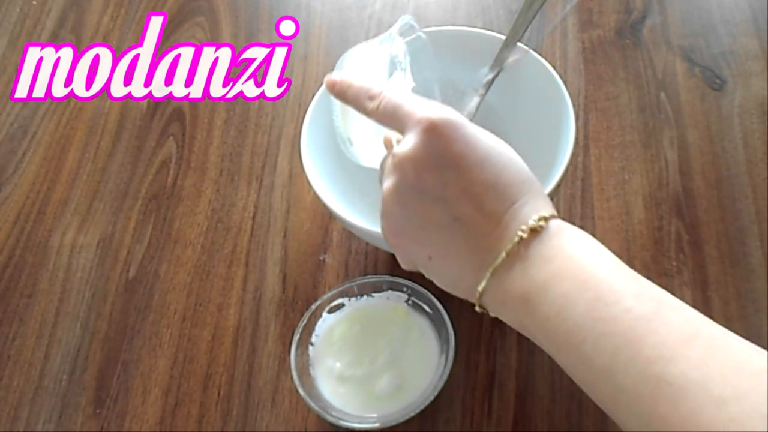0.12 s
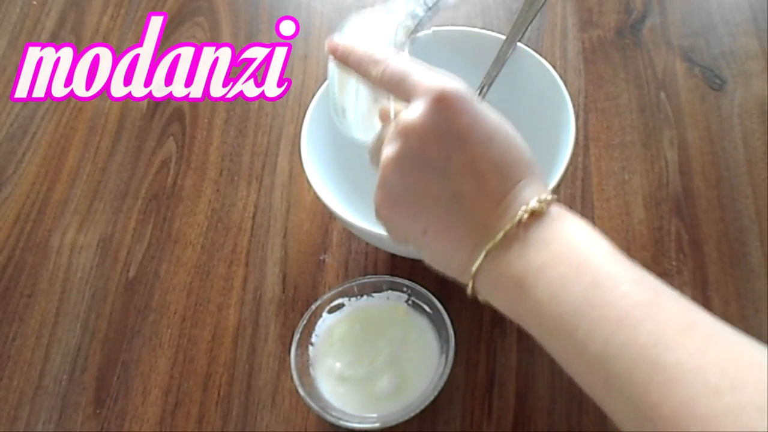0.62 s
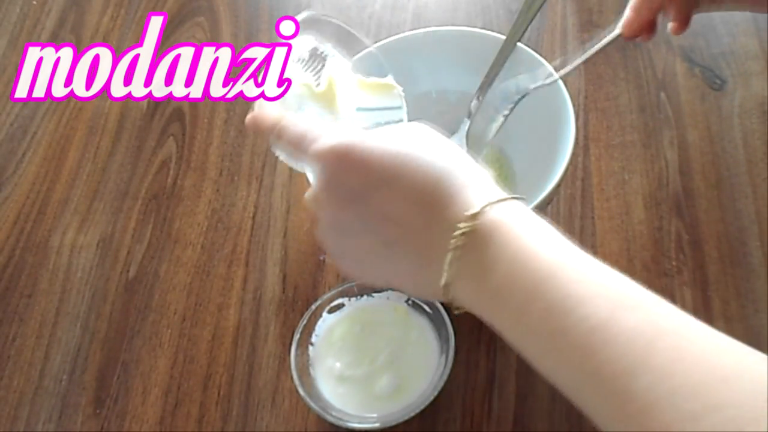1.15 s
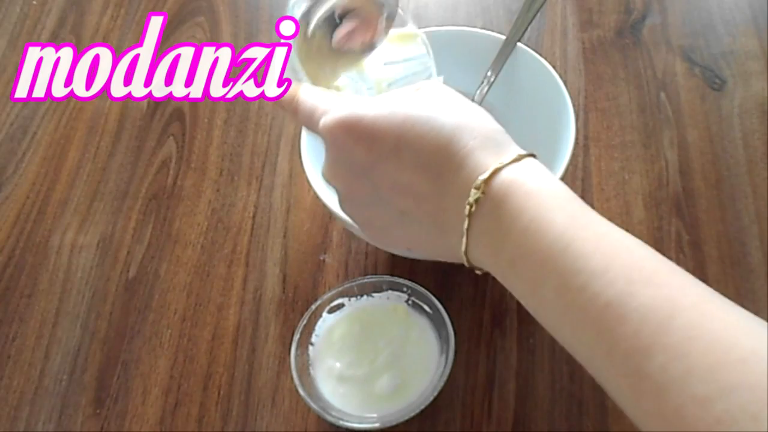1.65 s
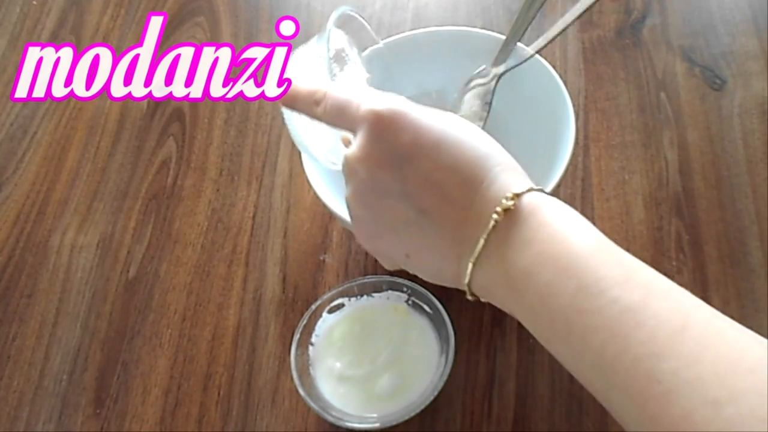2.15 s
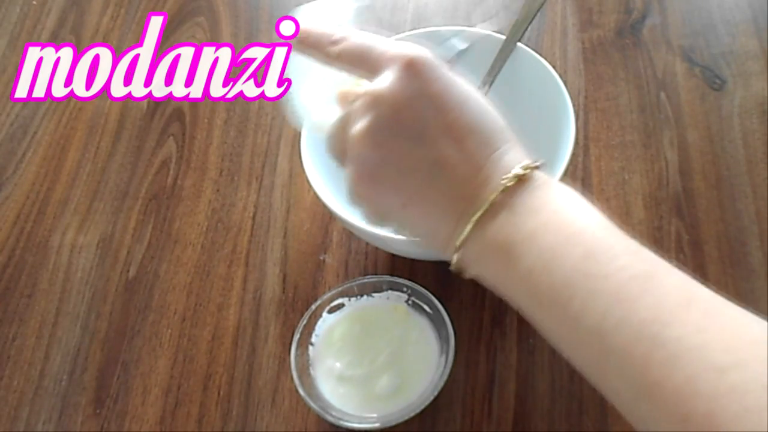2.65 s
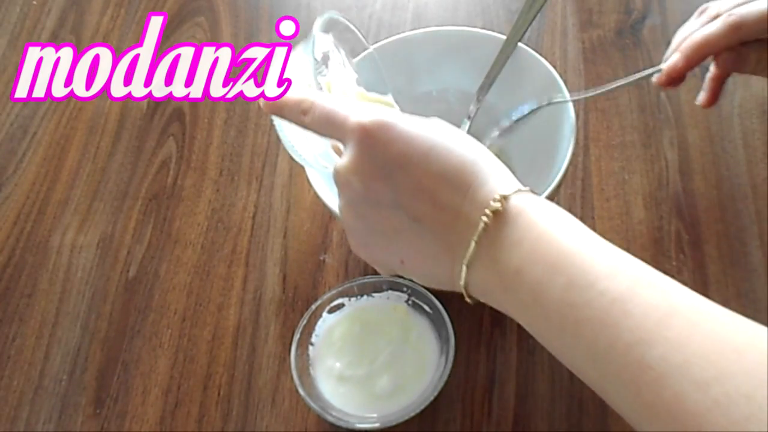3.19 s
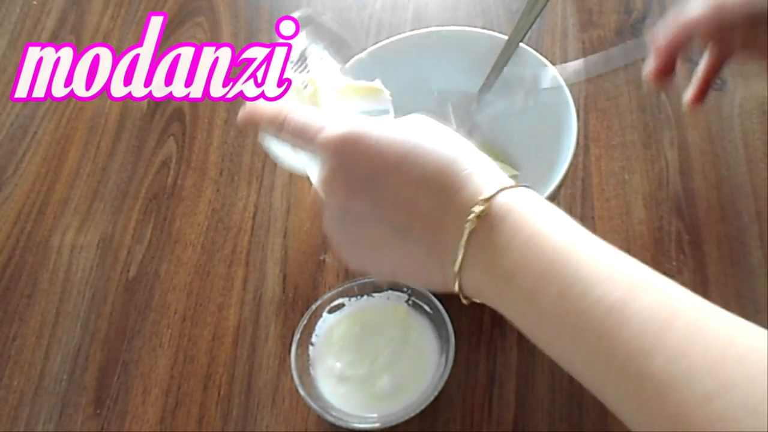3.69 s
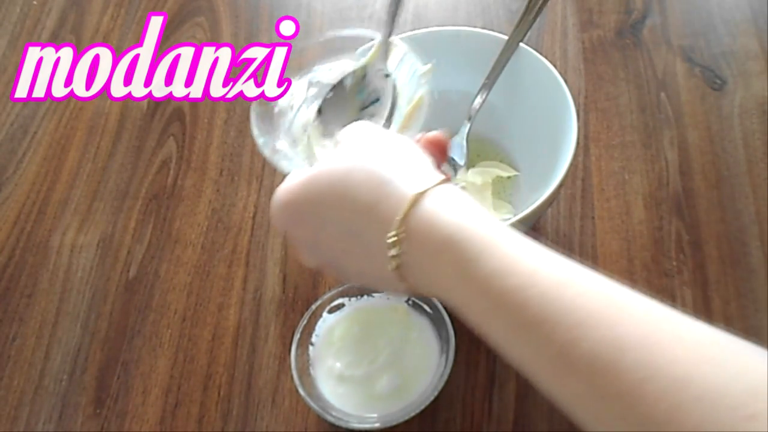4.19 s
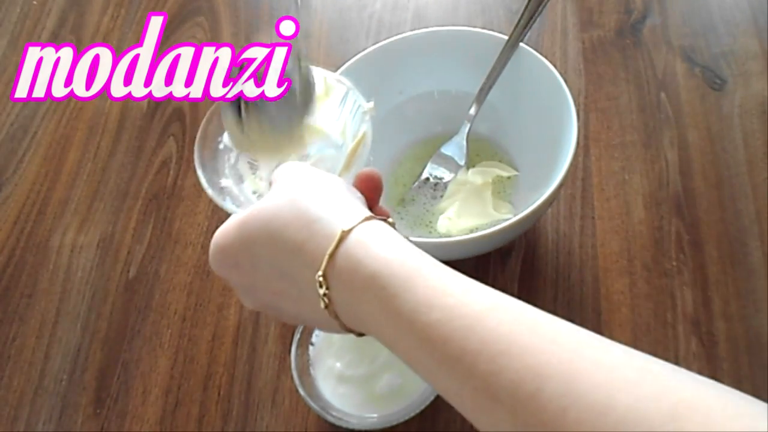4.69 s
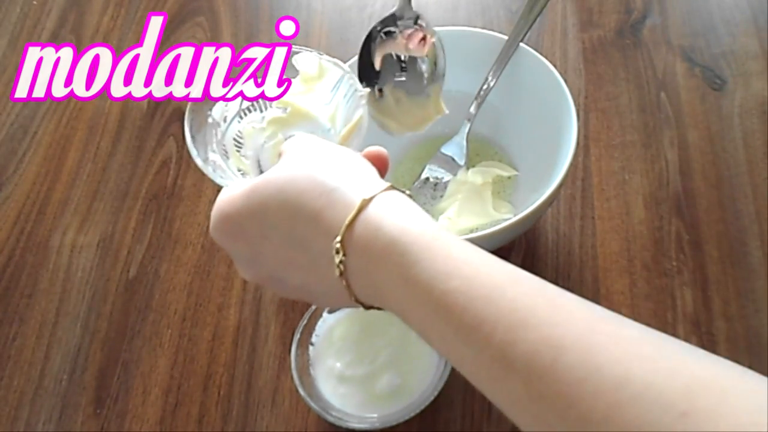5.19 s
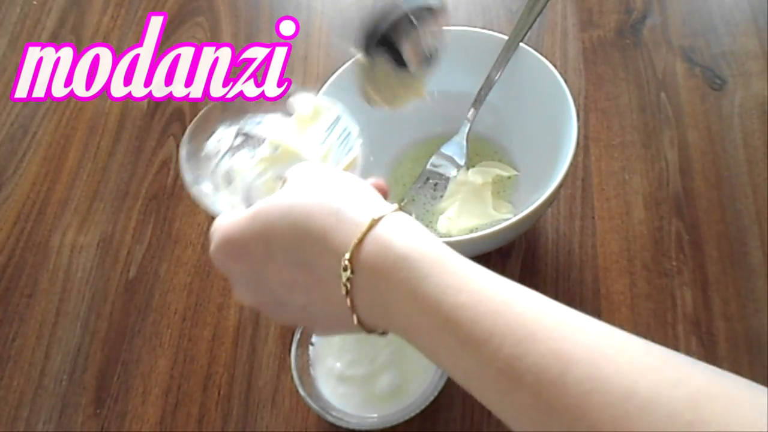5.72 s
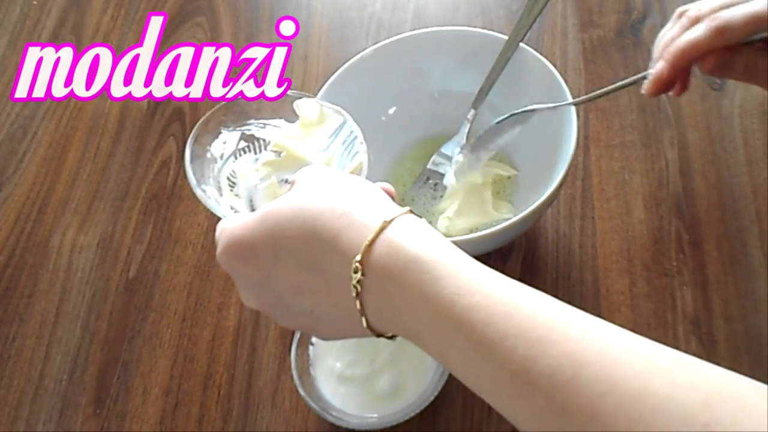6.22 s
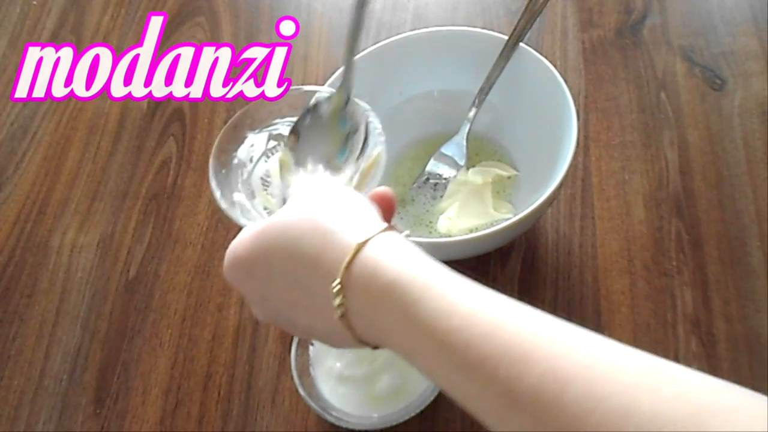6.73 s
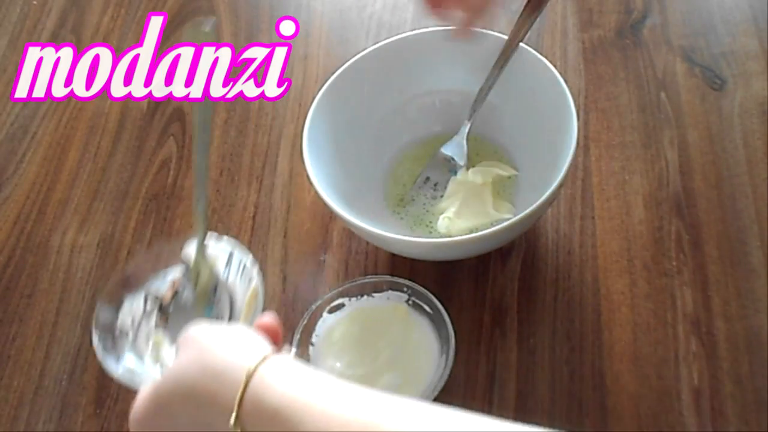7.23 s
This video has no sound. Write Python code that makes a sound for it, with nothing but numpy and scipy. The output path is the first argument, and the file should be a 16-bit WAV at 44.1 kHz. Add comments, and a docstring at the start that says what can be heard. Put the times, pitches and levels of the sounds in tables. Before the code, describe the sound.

Close up in a small, fairly dry room with soft hiss and low rumble, a metal spoon scoops thick cream from a hand-held glass bowl. Short, damped clinks come in loose clusters with faint scrapes. Around three seconds, four hard knocks on a large bowl ring out, the first two very loud, with a fork singing faintly inside. Afterwards there are a few separated clinks and a final firm tap with a dull thud.

```python
"""A small room with a soft hiss and rumble: a metal spoon scoops thick cream from a hand-held glass bowl.
Damped clinks are short-lived modes with a noisy crack; scrapes are rows of tiny slips; thumps are single pushes.
Four harder knocks on a large bowl shake the food off; bowl, wooden table and a fork lying in it ring.
Random echoes answer the spoon. A microphone filter closes its sound above about 9 kHz."""
import sys
import numpy as np
from scipy import signal
from scipy.fft import rfft, irfft, next_fast_len
from scipy.io import wavfile
from scipy.ndimage import uniform_filter1d

SR = 44100
rng = np.random.default_rng(int(sys.argv[2]) if len(sys.argv) > 2 else 0)


def transcribe(u):
    """Save the signal u as a 16-bit wav file named by the first command-line argument.

    u: samples, shape (n,) or (channels, n), limited to [-1, 1]; the rate is SR.
    q: integer samples, one column per channel.
    """
    v = np.clip(np.atleast_2d(u).T, -1, 1)
    q = np.round(v * 32767).astype(np.int16)
    wavfile.write(sys.argv[1], SR, q)


N = 324770  # length in samples

# background colour: pitch_hz, shape_db (relative)
HISS_COLOUR = [(12, -23.5), (22, 2), (32, 3.5), (48, -5), (71, -22.5), (129, -6.5), (223, -12),
               (494, -14.5), (551, -13), (599, -16.5), (980, -17), (1400, -18.5), (2000, -20),
               (2170, -19.5), (7660, -24.5), (14000, -66.5)]
HISS_DB = -54  # level before the swell
# background ups and downs: time_s, treble_db, bass_db (both weighted by pitch later)
SWELL = [(0, 4.5, 6.5), (.2, 5, 7.5), (.45, 1.5, 1.5), (.9, 10, -3.5), (1.05, -0.5, 2), (1.8, -1, -1.5),
         (2.2, 4.5, 3), (2.45, 1.5, 4.5), (2.8, 8, -1.5), (3.101, -1.5, 3), (3.8, -0.5, 12), (4, -8, 7),
         (4.101, -1, 8.5), (4.502, -2.5, 1), (6.698, -1.5, 0.5), (6.95, 12, -2.5), (7.1, -2, -1),
         (7.36, 1, 3.5)]
# how fast the echoes die: pitch_hz, t60_s (time to fall by 60 dB)
ROOM_DECAY = [(200, 0.12), (800, 0.035), (2500, 0.16), (5500, 0.13), (9000, .15)]
ROOM_DB = -10
# how the microphone colours the spoon: pitch_hz, gain_db
MICROPHONE = [(8800, 2), (9400, -3), (10000, -30.5), (13000, -23.5), (14000, -45.5), (16000, -57.5),
              (16500, -76.5)]
# the spoon bottoms out with a dull push: start_s, level_db
THUMPS = [(0.434, -32), (1.737, -38), (6.771, -17), (6.98, -54)]
# the spoon edge slides over glass: start_s, end_s, rms_db, low_ring_hz, high_ring_hz
SCRAPES = [(.01, 0.058, -46.5, 1750, 2900), (0.038, 0.039, -46.5, 1860, 3430),
           (0.102, 0.16, -47, 1690, 2900), (0.127, 0.187, -52.5, 3750, 5830),
           (1.923, 2.102, -51, 1934, 2960), (2.18, 2.229, -50, 1490, 3530), (2.182, 2.253, -59, 5800, 9200),
           (6.9, 6.996, -59, 2680, 5360), (6.919, 6.984, -49.5, 1050, 1470)]
# spoon on the small bowl: start_s, glass_db, then against the glass: neck_db, edge_db, bowl_db (parts of the spoon)
CLINKS = [(0.0074, -45.5, 1.5, 13.5, -16), (0.11, -52, -3, -11, 1), (0.1841, -44.5, -14, -18, -23),
          (0.436, -9.5, -6, -5, -10), (0.4489, -30, 1, -11, 1.5), (0.6782, -16.5, -7.5, -22, -17),
          (0.682, -12.5, -13, 3.5, -14.5), (0.7895, -17.5, -8, 0, -12.5), (0.8773, -27.5, -8, -4.5, -8.5),
          (0.9334, -55, -4, -13, -1), (1.707, -12.5, -4.5, 3.5, -14.5), (1.7398, -19.5, 0, 1, -6.5),
          (1.927, -38, 0.5, -7, -7), (2.2323, -45.5, -12, -13, -3), (2.5809, -14.5, -12, 4.5, -33),
          (2.5854, -17.5, 0, 5, -10), (2.67, -20, -14, -0.5, -5), (2.7228, -19.5, -8.5, -12, -9.5),
          (2.767, -31.5, -9.5, -33, -27), (4.2654, -15, -6.5, 1.5, -6.5), (4.2924, -19, -25, 1.5, -8),
          (4.6952, -49.5, -3.5, 1, -13), (4.825, -75.5, 2.5, -2, -9.5), (5.3844, -15.5, -9, -0.5, -7),
          (6.771, -6, -15.5, -10.5, -15), (6.7814, -20.5, -10, -15, -13), (6.8458, -39, -12, 3, -19),
          (6.9824, -13, -5.5, 4.5, -1.5), (7.2124, -48.5, -3.5, 3, -4.5)]
# spoon on the large bowl: start_s, bowl_db, then the fork in it: middle_note_db, low_db (fork's low note with
# the bowl's deep hum), second_note_db
KNOCKS = [(3.1571, 3.5, -20, -24.5, -5.5), (3.4229, -2.5, -39, -16.5, -18), (3.5778, -13, -19, -26.5, -32),
          (3.7226, -14, -19.5, -29, -37.5)]

# Bodies are lists of mode groups; each mode: pitch_hz, level_db (relative), t60_s, after_ring_db (relative)
# groups: glass, low, lower glass, spoon neck, spoon edge, spoon bowl; damped by hand and cream
SMALL_BOWL = [
    [(5550, 0.5, 0.014, -40.5), (6005, -5.5, .02, -46.5), (8970, -8, 0.016, -52.5)],
    [(1050, -4.5, 0.014, -27), (1437, 3, 0.016, -27), (1734, 1.5, 0.01, -26.5)],
    [(2586, 2.5, 0.052, -25.5), (2858, 4.5, 0.035, -28)],
    [(3325, 5.5, 0.029, -25.5), (4320, 3.5, 0.0093, -33)],
    [(6825, -3.5, 0.015, -36.5), (7800, -6.5, 0.02, -43), (10430, -1.5, 0.01, -32.5),
     (11170, -8, 0.04, -37.5), (12770, -7, 0.027, -37.5), (13790, -3, 0.021, -33.5)],
    [(2184, -5.5, 0.051, -37.5), (3750, 8.5, 0.014, -28.5), (5192, 5, 0.032, -36.5)],
]
# the large bowl and the table under it; the first group is the reference
LARGE_BOWL = [
    [(2900, -10.5, 0.0065, -42), (3750, -0.5, 0.015, -32), (4038, -4, 0.021, -37)],
    [(122, -7, .3, -28), (171, -3, .3, -26), (209, -8, .2, -26), (255, -7, .2, -26), (307, -6, .3, -26),
     (400, -3, .18, -23), (452, -6, .15, -25)],
    [(530, -8.5, 0.087, -15), (564.6, 0, 0.29, -14.5), (698, -4.5, 0.11, -17.5), (820, 0.5, 0.095, -17),
     (1041, -14.5, 0.09, -14), (1160, -12, 0.056, -19), (1290, -7.5, 0.085, -17)],
    [(1648, -8, 0.065, -12.5), (2089, 0.5, .06, -12.5)],
    [(4700, -16, .04, -20.5), (5210, -0.5, 0.056, -20.5), (6104, 1, 0.014, -26.5), (7690, -6.5, 0.039, -28),
     (11300, -4.5, 0.04, -43)],
]
# groups: middle note, low group (the fork's 946 Hz note with the large bowl's long, faint 515 Hz hum), second
# note, third note, top notes
FORK = [
    [(4962, -14, .12, -45), (5006, 0, .19, -45), (5018, -19, .8, -28)],
    [(515, -30, .8, -30), (946, -4, .42, -36)],
    [(1945, -3, .25, -45), (1948, -14, .45, -40)],
    [(3336, 0, .17, -45), (3342, -14, .35, -27)],
    [(6961, -5, .24, -23), (9113, 1, .13, -22), (10860, -5, .3, -28), (13010, 1, .13, -24),
     (14760, -3, .22, -30)],
]
# how a knock shares out over the large bowl's other groups: level_db against the first group
BOWL_GROUPS_DB = (-13, -17.5, -17, -8.5)

# how each body takes a blow: crack_db, crack_t60_s, rattle_db, rattle_t60_s, rise_cycles,
# after_ring_t60_s (one per group)
CLINK_MANNER = (1, .028, -7, .07, .3, [.7, .3, .75, .4, .26, .45])
KNOCK_MANNER = (-2, .03, -7, .2, 1.2, [.3, .5, .35, .3, .25])
FORK_MANNER = (-30, 0.023, -31.5, .1, 1.6, [0.27, 2.6, 1.6, 0.12, 0.18])

# light touches sound dull: below FIRM_DB the low and lower glass groups gain on the glass
FIRM_DB, LOW_DB, LOW_GAIN_PER_DB, LOWER_DB, LOWER_GAIN_PER_DB = -25.5, -12, 0.78, -10, 0.3179
EDGE_ON_DB, EDGE_LOSS_PER_DB = -3, 1.67  # an edge louder than this weakens the lower glass group
THIRD_DB, TOP_DB = 3, -4  # third note over the mean of the low group and second note; top notes over the second
SLIPS_PER_S = 2500  # on average
EASE_DB_PER_S = -74  # the pressure eases along a stroke


def gain_of(db):
    """Turns decibels into a gain."""
    return 10 ** (np.asarray(db) / 20)


def evened(x):
    """Scales a signal to an rms of 1."""
    return x / np.sqrt(np.mean(x ** 2) + 1e-20)


def read(points, hz):
    """Reads a curve between its points, with pitch on a log scale."""
    f, value = np.transpose(points)
    return np.interp(np.log(hz + 1), np.log(f + 1), value)


def add(mix, start_s, sound):
    """Adds a sound to the mix at its start time."""
    part = mix[max(round(start_s * SR), 0):][:len(sound)]
    part += sound[:len(part)]


def squash(x, top, order):
    """Bends peaks softly toward the level top; a higher order is a harder knee."""
    return x / (1 + (abs(x) / top) ** order) ** (1 / order)


def background():
    """Smooth hiss over a lumpy rumble: shaped noise whose treble and bass swell by their own amounts."""
    hop, window = 256, 1024
    frames, hz = N // hop + 5, np.fft.rfftfreq(window, 1 / SR)
    real, imaginary, patches = rng.standard_normal((frames, len(hz), 3)).T
    # slight uneven patches, smoothed over pitch and then over time
    patches = evened(uniform_filter1d(uniform_filter1d(patches, 8, 0), 16, 1))
    spectrum = (real + 1j * imaginary) * gain_of(read(HISS_COLOUR, hz)[:, None] + 0.27 * patches)
    steady = signal.istft(spectrum, nperseg=window, noverlap=window - hop)[1]
    scale = gain_of(HISS_DB) / np.std(steady)

    time_s, treble_db, bass_db = np.transpose(SWELL)
    t = np.arange(frames) * hop / SR
    treble_share = read([(500, 0.0086), (2500, 0.94)], hz)[:, None]
    treble_swell_db = treble_share * np.interp(t, time_s, treble_db)
    bass_swell_db = (1.5 - treble_share) * np.interp(t, time_s, bass_db)
    spectrum *= gain_of(treble_swell_db + bass_swell_db)
    return scale * signal.istft(spectrum, nperseg=window, noverlap=window - hop)[1][:N]


def room(x):
    """Walls send back sparse echoes of random sign, each band dying at its own speed."""
    taps = np.zeros(SR)
    at = np.arange(130, SR - 20, 20)
    taps[at + rng.integers(0, 20, len(at))] = rng.choice([-1., 1.], len(at))
    hz, t, spectrum = signal.stft(taps, SR, nperseg=256)
    decay = gain_of(-60 * t / read(ROOM_DECAY, hz)[:, None])
    tail = signal.istft(spectrum * decay, SR, nperseg=256)[1]
    return gain_of(ROOM_DB) * signal.fftconvolve(x, tail / np.linalg.norm(tail))[:N]


def thumps():
    """One push and release of the hand-held bowl, with no ring."""
    out, u = np.zeros(N), np.arange(1000) / SR / 0.00043
    for start_s, level_db in THUMPS:
        add(out, start_s, gain_of(level_db) * u * (2 - u) * np.exp(1 - u))
    return out


def scrapes():
    """Uneven little slips tick two short rings and some grit under each stroke."""
    out, t = np.zeros(N), np.arange(1500) / SR
    for start_s, end_s, rms_db, low_hz, high_hz in SCRAPES:
        size = round((end_s - start_s) * SR)
        pressure = signal.windows.tukey(size, .25) * gain_of(EASE_DB_PER_S * np.arange(size) / SR)
        slips = (rng.random(size) < SLIPS_PER_S / SR) * rng.standard_normal(size) * pressure
        low = np.sin(2 * np.pi * low_hz * t) * gain_of(-60 * t / .025)
        high = .9 * np.sin(2 * np.pi * high_hz * t) * gain_of(-60 * t / .014)
        grit = .5 * np.diff(rng.standard_normal(len(t) + 1)) * gain_of(-60 * t / 0.0053)
        stroke = signal.fftconvolve(slips, low + high + grit)
        add(out, start_s, gain_of(rms_db) * evened(stroke))
    return out


def blows(rows, body, manner, fuzz_hz, spread, scatter_db, size):
    """Each blow rings the modes of the body, with a short crack, a rattle and a faint, fuzzy after-ring.

    rows: start_s, level_db, then each further group's dB against that level.
    fuzz_hz: width of the after-ring; spread: share by which modes shift; scatter_db: chance in their level.
    """
    out, t, bins = np.zeros(N), np.arange(size) / SR, np.fft.rfftfreq(size, 1 / SR)
    hz, level_db, t60, after_db = np.concatenate(body).T[:, :, None]
    group = np.repeat(np.arange(len(body)), [len(g) for g in body])
    crack_db, crack_t60, rattle_db, rattle_t60, rise_cycles, after_t60 = manner
    crack_fade = gain_of(crack_db - 60 * t / crack_t60)
    rattle_fade = gain_of(rattle_db - 60 * t / rattle_t60)
    peaks = gain_of(after_db) / (1 + (2 * (bins - hz) / fuzz_hz) ** 2) / np.sqrt(fuzz_hz / SR)
    fuzz = np.array([peaks[group == g].sum(0) for g in range(len(body))])
    after_fade = gain_of(-60 * t / np.array(after_t60)[:, None])
    rise = np.minimum(t * hz / rise_cycles, 1)  # low modes take longer to build up
    order = np.argsort(hz[:, 0])
    for start_s, db, *others_db in rows:
        struck_db = db + np.array([0, *others_db])[:, None]
        mode_db = struck_db[group] + level_db
        # grip and spot shift the modes a little
        turns = hz * (1 + spread * rng.standard_normal(hz.shape)) * t
        sign = rng.choice([-1, 1], hz.shape)
        chance_db = scatter_db * rng.standard_normal(hz.shape)
        rings = sign * rise * gain_of(mode_db + chance_db - 60 * t / t60) * np.sin(2 * np.pi * turns)

        # crack and rattle share one noise, coloured by the modes and weak in the deepest bass
        bass_point = [20, mode_db[order[0], 0] - 48]
        colour = np.vstack([bass_point, np.hstack([hz, mode_db])[order]])
        crack_noise, after_noise = rfft(rng.standard_normal((2, size)))
        crack = irfft(crack_noise * gain_of(read(colour, bins)), size) * (crack_fade + rattle_fade)
        after = gain_of(struck_db) * irfft(after_noise * fuzz, size) * after_fade
        onset = np.minimum(t / 0.00011, 1)
        add(out, start_s, (rings.sum(0) + crack + after.sum(0)) * onset)
    return out


def fork_ringing():
    """Each knock sets the fork in the large bowl singing in long, narrow notes."""
    rows = []
    for start_s, _, middle, low, second in KNOCKS:
        third = (low + second) / 2 + THIRD_DB
        top = second + TOP_DB
        rows.append((start_s, middle, low - middle, second - middle, third - middle, top - middle))
    return blows(rows, FORK, FORK_MANNER, fuzz_hz=25, spread=.0003, scatter_db=0, size=2 * SR)


def knocks():
    """The spoon hits the large bowl, which rings together with the table under it."""
    rows = [(start_s, bowl_db, *BOWL_GROUPS_DB) for start_s, bowl_db, *_ in KNOCKS]
    return blows(rows, LARGE_BOWL, KNOCK_MANNER, fuzz_hz=160, spread=.008, scatter_db=2, size=SR)


def clinks():
    """The spoon taps the small bowl; hand and cream damp it, and light touches sound duller."""
    start_s, glass_db, neck, edge, bowl = np.transpose(CLINKS)
    light = np.maximum(FIRM_DB - glass_db, 0)
    low = LOW_DB + LOW_GAIN_PER_DB * light
    edge_loss = EDGE_LOSS_PER_DB * np.maximum(edge - EDGE_ON_DB, 0)
    lower = LOWER_DB + LOWER_GAIN_PER_DB * light - edge_loss
    rows = np.transpose([start_s, glass_db, low, lower, neck, edge, bowl])
    return blows(rows, SMALL_BOWL, CLINK_MANNER, fuzz_hz=250, spread=.02, scatter_db=3, size=SR // 2)


def scene():
    """Spoon, bowls and fork with their echoes, plus the thumps without echo."""
    spoon = clinks() + knocks() + fork_ringing() + scrapes()
    return (spoon + room(spoon) + thumps())[None]


def band_limit(x):
    """A steep low-pass at the top of the band."""
    return signal.sosfilt(signal.butter(12, 16410, fs=SR, output="sos"), x)


def record(dry):
    """The hardest blows overload the input, a filter shuts off the top, the converter caps the last peaks."""
    size = next_fast_len(N + 2048)
    spectrum = rfft(squash(dry, top=.8, order=4), size)
    microphone_gain = gain_of(read(MICROPHONE, np.fft.rfftfreq(size, 1 / SR)))
    coloured = irfft(spectrum * microphone_gain, size)[:, :N]
    mix = squash(coloured + background(), top=.98, order=10)
    return band_limit(mix)


dry = scene()
out = record(dry)
transcribe(out)
```